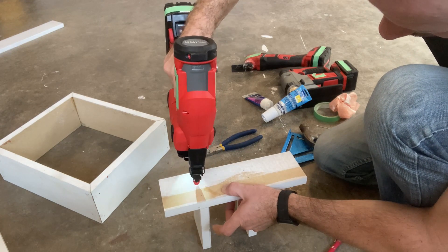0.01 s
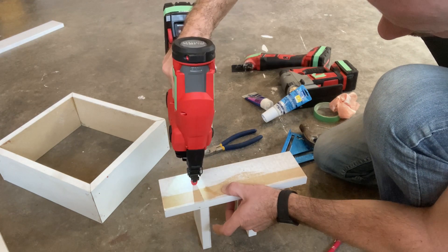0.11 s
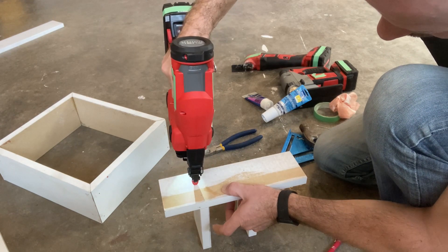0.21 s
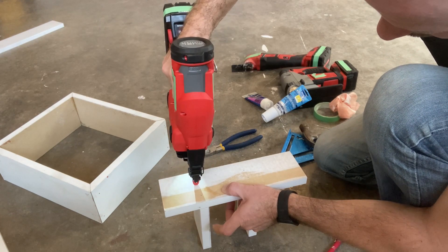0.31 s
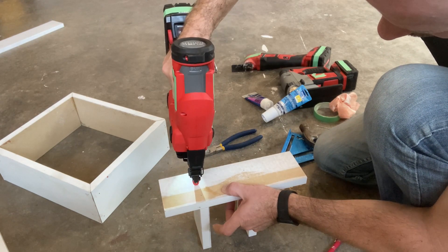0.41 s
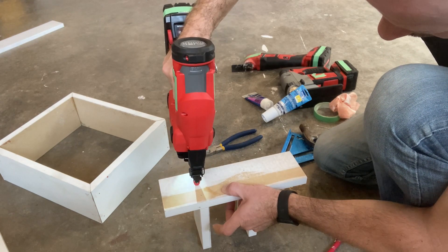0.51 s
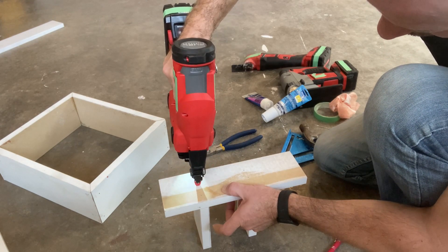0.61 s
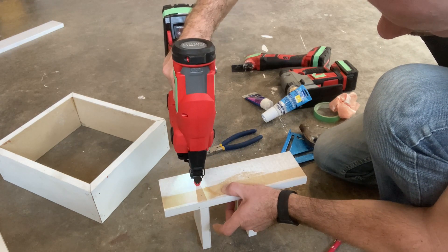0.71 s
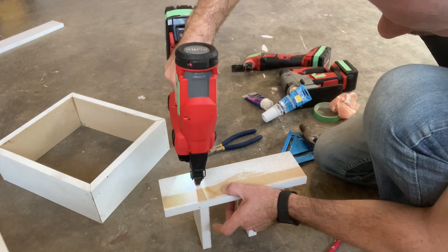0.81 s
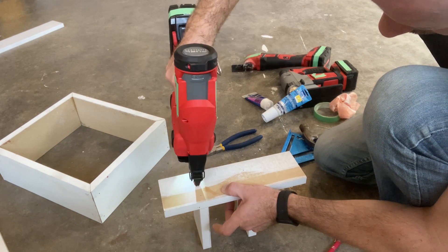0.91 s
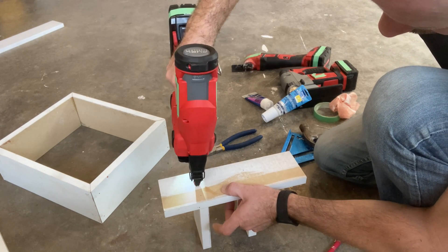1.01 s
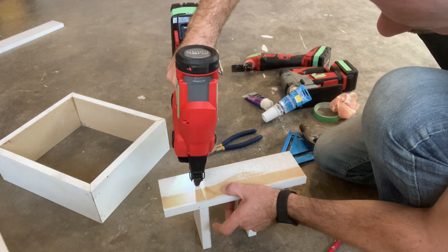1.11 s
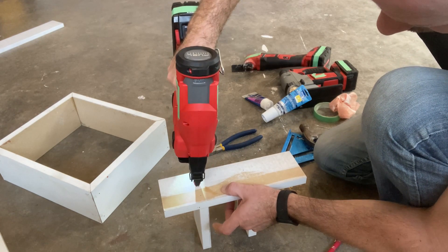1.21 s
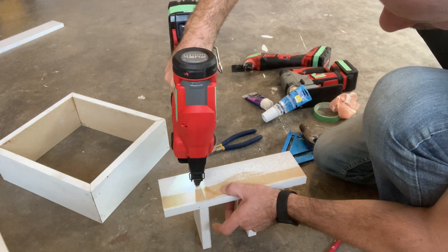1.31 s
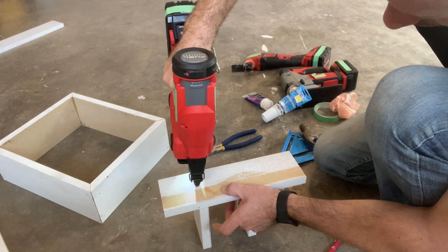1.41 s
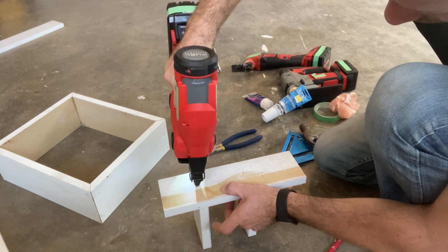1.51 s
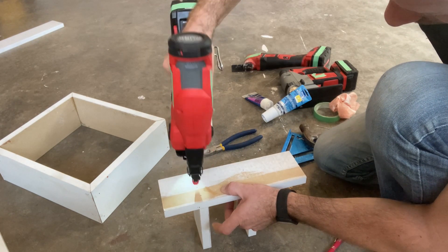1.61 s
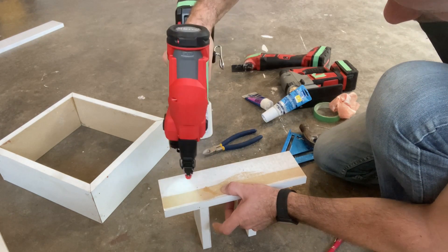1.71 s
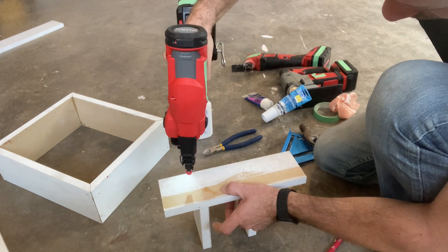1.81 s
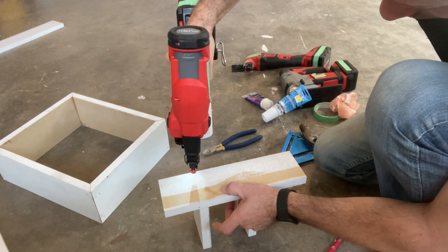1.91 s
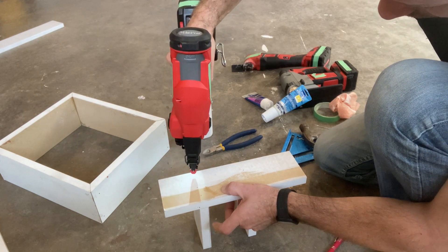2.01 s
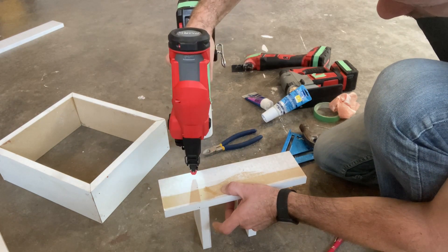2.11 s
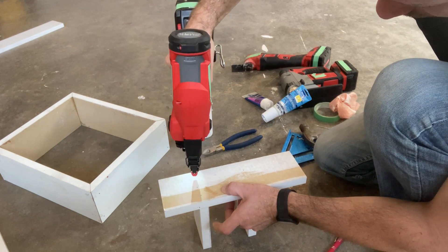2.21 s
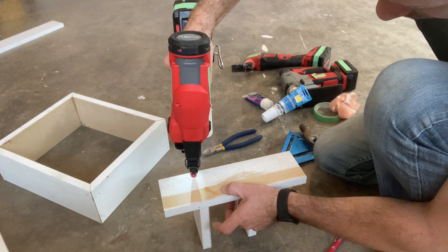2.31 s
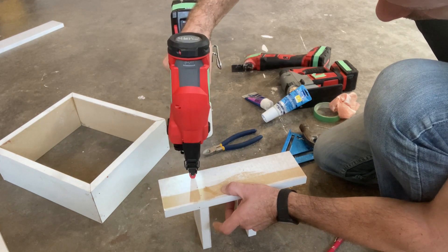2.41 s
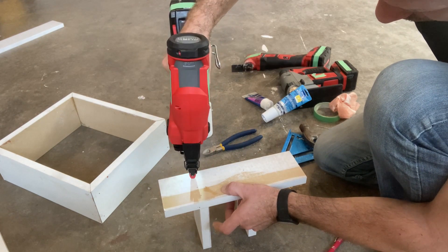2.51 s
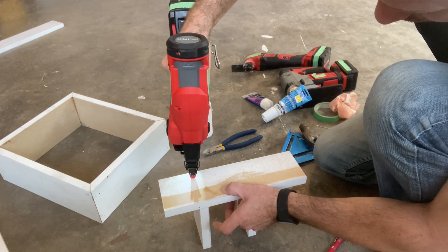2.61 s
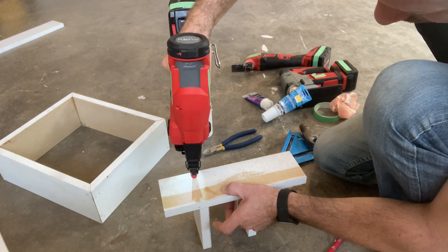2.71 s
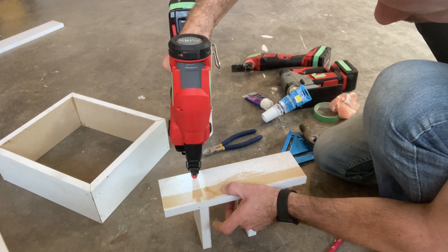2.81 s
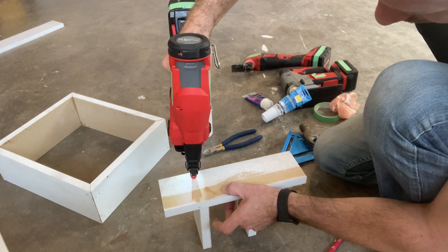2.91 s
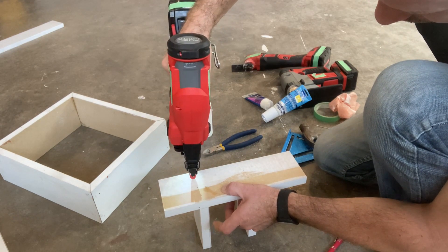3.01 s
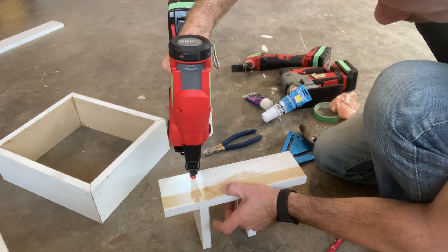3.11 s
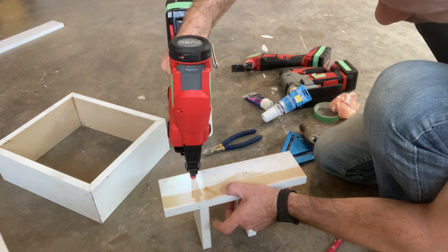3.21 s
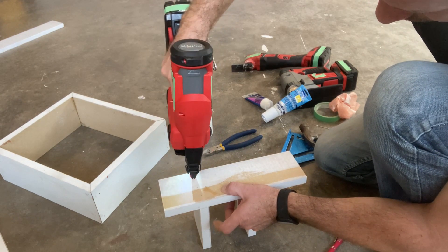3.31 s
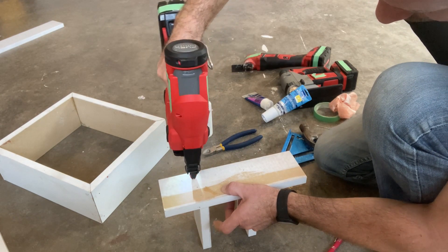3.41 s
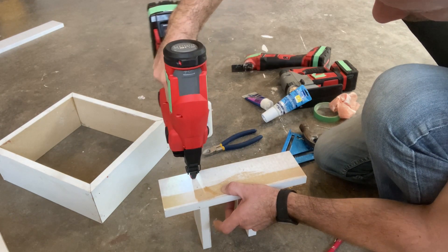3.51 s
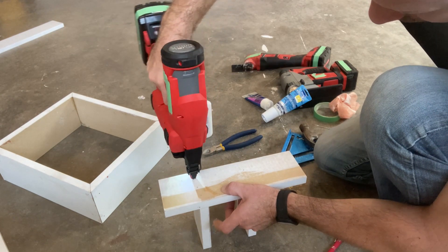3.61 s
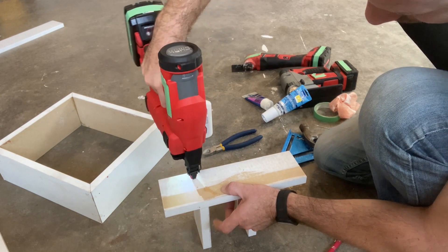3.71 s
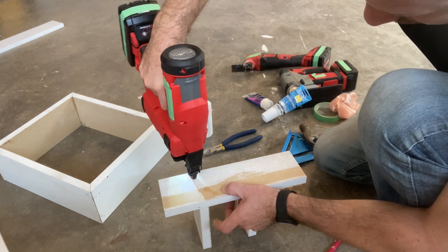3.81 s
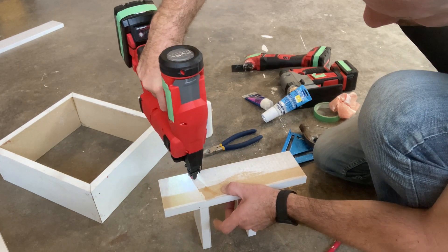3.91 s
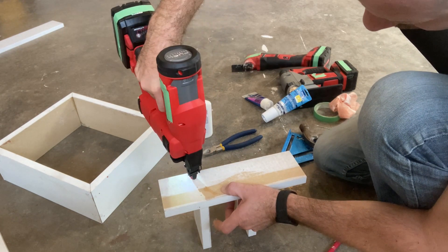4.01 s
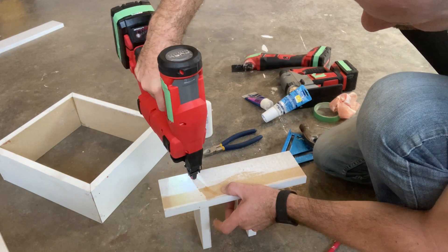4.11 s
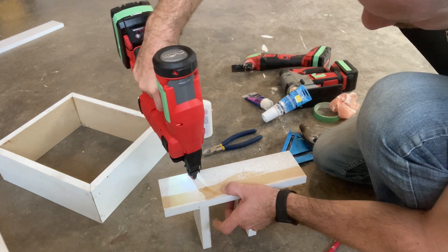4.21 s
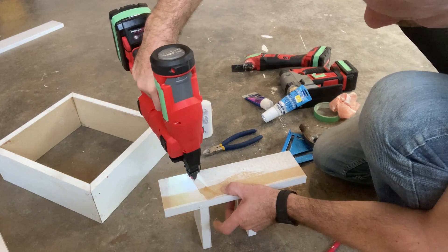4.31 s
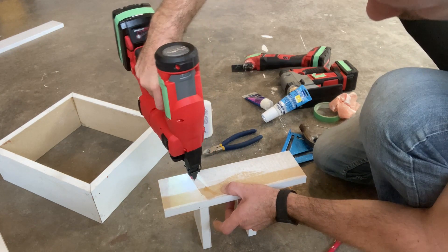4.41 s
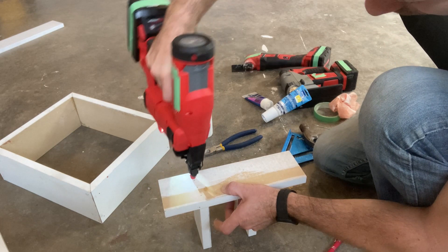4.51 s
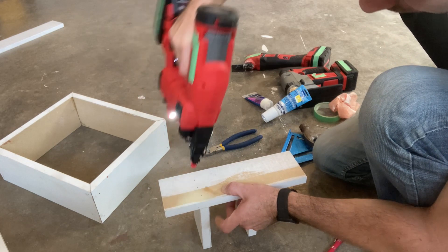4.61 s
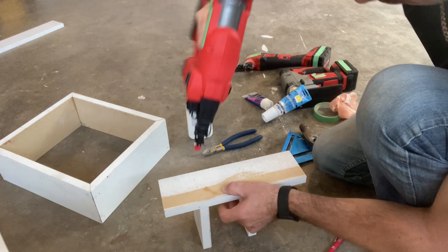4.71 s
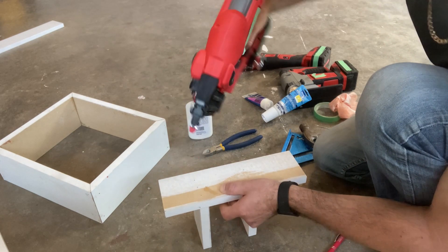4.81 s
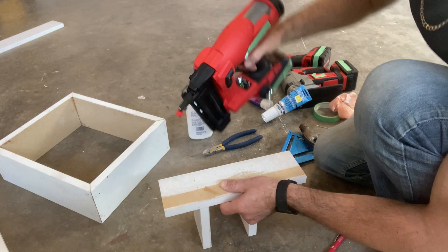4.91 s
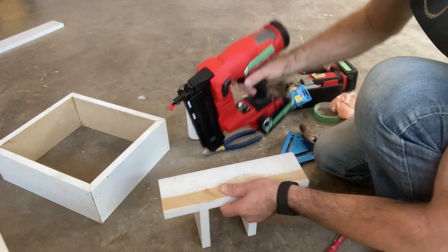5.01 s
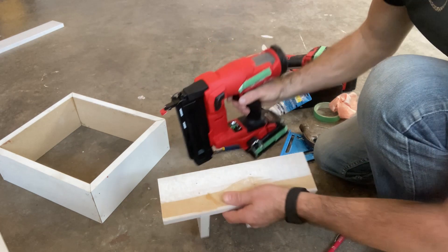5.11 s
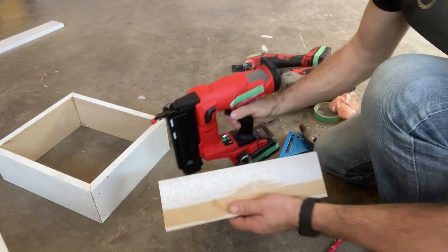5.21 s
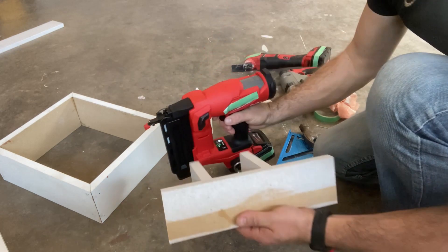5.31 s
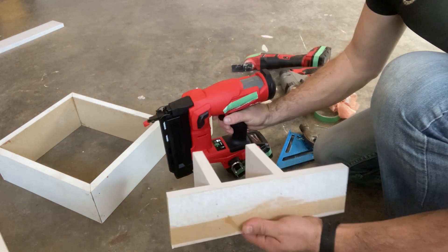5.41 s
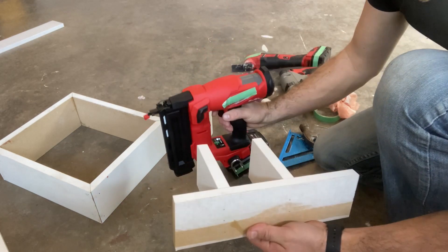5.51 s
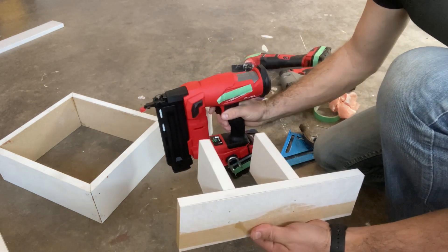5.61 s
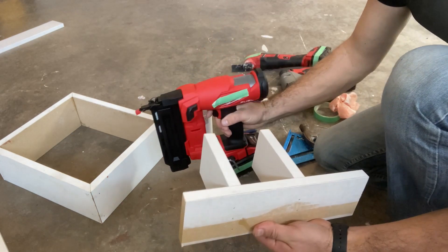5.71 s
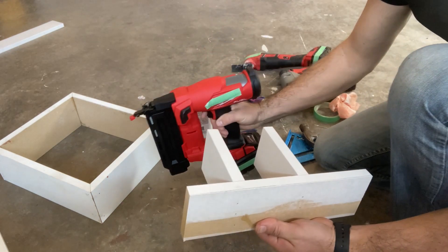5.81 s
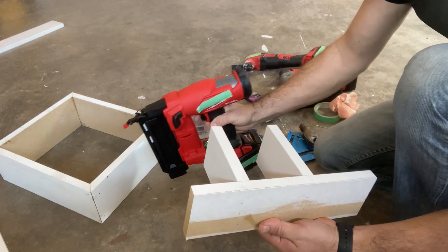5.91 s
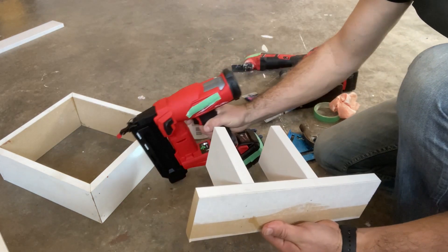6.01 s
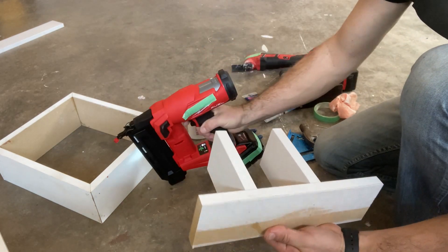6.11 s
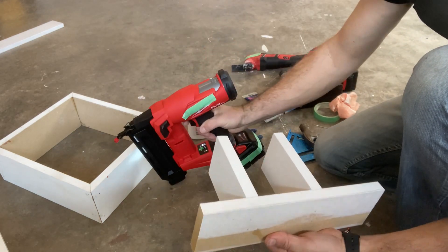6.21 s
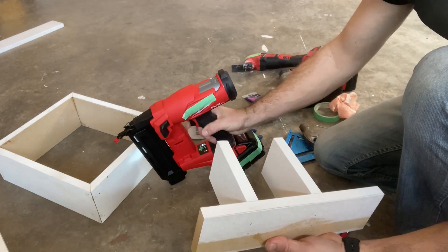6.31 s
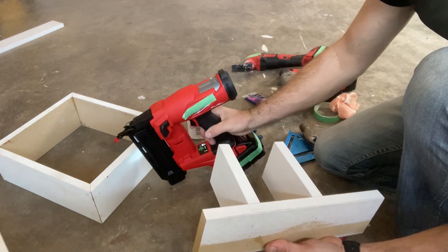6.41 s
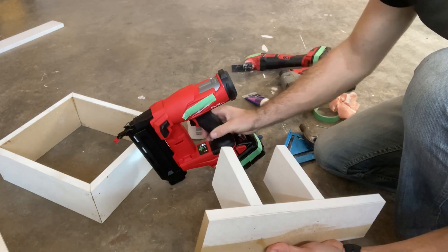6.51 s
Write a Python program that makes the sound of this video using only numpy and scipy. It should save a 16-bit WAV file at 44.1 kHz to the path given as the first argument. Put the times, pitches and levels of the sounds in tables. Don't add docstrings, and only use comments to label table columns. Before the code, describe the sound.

Quiet room tone with a low far fan, small ticks and a short rising wood creak, then a cracking nail shot with gritty gear rattle and sharp latches. Soft repositioning clicks and a slight fan swell lead to a second similar shot. Finally dull knocks and clacks as the tool and plank settle on the floor. Close stereo microphone, lively reverberant hall.

```python
import sys
import numpy as np
from scipy import signal
from scipy.fft import rfft, irfft
from scipy.io import wavfile
from scipy.ndimage import uniform_filter1d

SR = 44100
rng = np.random.default_rng(int(sys.argv[2]) if len(sys.argv) > 2 else 0)


def store_wav(level_fs):
    pcm = np.round(np.clip(np.atleast_2d(level_fs), -1, 1) * 32767)
    wavfile.write(sys.argv[1], SR, pcm.T.astype(np.int16))


def makeup_ratio(level_db):
    decades = np.asarray(level_db, float) / 20
    return 10 ** decades


N = 288855


def evened(x):
    return x / np.sqrt(np.mean(x ** 2) + 1e-20)


def read(points, hz):
    f, value = np.transpose(points)
    return np.interp(np.log(hz + 1), np.log(f + 1), value)


def add(mix, s, sound):
    part = mix[round(s * SR):][:len(sound)]
    part += sound[:len(part)]


def band(x, lo_hz, hi_hz):
    return signal.sosfilt(signal.butter(2, [lo_hz, hi_hz], "bandpass", fs=SR, output="sos"), x)


def coloured(x, points):
    n = x.shape[-1]
    return irfft(rfft(x) * makeup_ratio(read(points, np.fft.rfftfreq(n, 1 / SR))), n)


def resonate(x, hz, width):
    turn = np.exp(2j * np.pi * np.cumsum(hz * np.ones(len(x))) / SR)
    r = np.exp(-np.pi * width / SR)
    return 2 * (turn * signal.lfilter([1 - r], [1, -r], x / turn + 1e-18)).real


def resonate_twice(x, hz, width):
    return resonate(resonate(x, hz, width), hz, width)


def body(x, modes, detune=1, broad=0, widen=1):
    sign = 1 if broad else -1
    out = broad * x
    for k, (hz, width, db) in enumerate(modes):
        out = out + sign ** k * makeup_ratio(db) * resonate(x, hz * detune, width * widen)
    return out


def pair(a, b, same, hz):
    c = np.clip(read(same, hz), -1, 1)[:, None]
    return np.array([a, c * a + np.sqrt(1 - c ** 2) * b])


# f/Hz, level/dB per Hz
AIR = [(25, -23.5), (60, -9.5), (103, -11.5), (180, -21), (420, -27), (800, -27.5), (1450, -27.5),
       (1700, -33.5), (3000, -34), (7000, -39.5), (8800, -34.5), (11000, -40), (13500, -37.5),
       (15500, -51.5)]
# f/Hz, likeness [-1 to 1]
AIR_SAME = [(60, 0.95), (180, 0.91), (550, 0.34), (1650, 0.06), (4970, -0.07), (15000, 0.13)]


def air():
    frames, hz = N // 256 + 5, np.fft.rfftfreq(1024, 1 / SR)
    a, b, c, d, patches = rng.standard_normal((frames, 513, 5)).T
    patches = evened(uniform_filter1d(uniform_filter1d(patches, 12, 0), 14, 1))
    z = pair(a + 1j * b, c + 1j * d, AIR_SAME, hz) * makeup_ratio(read(AIR, hz)[:, None] + 0.88 * patches)
    return makeup_ratio(-64) * evened(signal.istft(z, nperseg=1024, noverlap=768)[1][:, :N])


def fan():
    t = np.arange(N) / SR
    swell_at_s, swell_s = 3.7, 0.35
    level = makeup_ratio(-76) + makeup_ratio(-63) * np.exp(-((t - swell_at_s) / swell_s) ** 2)
    return level * evened(resonate(rng.standard_normal(N), 94, 15))


def earlier_knock():
    fall_db = -60.5 - 81.0 * np.arange(N) / SR
    return makeup_ratio(fall_db) * evened(band(rng.standard_normal((2, N)), 650, 4600))


# f/Hz, t60/s
HALL = [(100, .5), (200, 0.43), (400, 0.93), (800, 0.72), (1840, 0.78), (4850, 0.83), (8000, 0.63),
        (12800, 0.47)]
# f/Hz, level/dB
HALL_COLOUR = [(60, -25), (200, -1.5), (600, 3.5), (3000, 3.5), (8000, 3), (15000, -7)]
# f/Hz, likeness [-1 to 1]
HALL_SAME = [(60, 0.8), (180, 1), (550, 0.06), (1650, 0.11), (4970, 0.02), (15000, 0.38)]


def hall(x, start_s, build_s, speed):
    slots = np.arange(0, 60000, 16)
    places = slots + rng.integers(0, 16, (2, len(slots)))
    taps = np.zeros((2, 60016))
    np.put_along_axis(taps, places, rng.choice([-1., 1.], (2, len(slots))), 1)
    hz, t, z = signal.stft(taps, SR, nperseg=256)
    build = np.clip((t - start_s) / build_s, 0, 1) ** 1.4
    decay_db = read(HALL_COLOUR, hz)[:, None] - 60 * speed * t / read(HALL, hz)[:, None]
    z = pair(*z, HALL_SAME, hz) * build * makeup_ratio(decay_db)
    tail = signal.istft(z, SR, nperseg=256)[1]
    return signal.fftconvolve(x[None], tail / np.linalg.norm(tail[0]), axes=1)[:, :N]


def all_round(x):
    z = rfft(x)
    even = np.sqrt(abs(uniform_filter1d(abs(z) ** 2, size=61)))
    return irfft(even * z / (abs(z) + 1e-12), len(x)) * np.linspace(1, 0, len(x)) ** 2


# f/Hz, width/Hz, level/dB
HOUSING = [(745, 140, 3.5), (1310, 100, -3), (1750, 250, -3), (2360, 400, -9.5), (3700, 400, -5.5),
           (4750, 1300, -7.5), (8700, 590, -10.5)]
# f/Hz, level/dB per Hz
TOOL = [(100, -38), (300, -14.5), (650, -2), (740, -1), (1060, -6.5), (1650, -0.5), (4800, -6), (5900, -12),
        (8800, -9.5), (11000, -13.5), (13500, -12), (16000, -20.5)]


def tool_noise(x, bright_db, detune, modes=HOUSING, broad=1.8, corner_hz=5500):
    n = len(x)
    z = rfft(coloured(body(evened(x), modes, detune, broad, widen=1.6), TOOL))
    low = 1 / (1 + (np.fft.rfftfreq(n, 1 / SR) / corner_hz) ** 3)
    return evened(irfft(z * low, n)) + makeup_ratio(bright_db) * evened(irfft(z * (1 - low), n))


# f/Hz, width/Hz, level/dB
PLANK = [(278.6, 40, -3.5), (420, 150, -0.5), (463, 220, -3), (760, 49, -6.5), (1177, 180, -4.5)]


def plank_knock(x, width_hz, detune):
    knock = body(resonate_twice(x, 540, width_hz), PLANK, detune)
    return knock / abs(knock).max()


def floor_thump(t, hz, ring_s):
    turns = np.cumsum(hz * (1 + 4.1 * np.exp(-t / 0.0018))) / SR
    return np.sin(2 * np.pi * turns) * np.exp(-t / ring_s) * np.minimum(t / .003, 1) * np.linspace(1, 0, len(t))


def hits(table, thump_hz, ring_s, push, knock_width_hz, **tool):
    ticks, sent, wood = np.zeros((3, N))
    t = np.arange(4096) / SR
    for s, tick_db, bright_db, knock_db, thump_db, ms in table:
        noise, detune = rng.standard_normal(4096), rng.uniform(.92, 1.08, 3)
        u = 5.29 * t / (max(ms, .5) / 1000)
        scuff = 0.097 * np.exp(-t / 0.035) * np.minimum(u, 1)
        burst = u ** 1.277 * np.exp(1 - u) + scuff
        tick = makeup_ratio(tick_db) * 0.45 * burst * tool_noise(noise, bright_db, detune[0], **tool)
        knock = makeup_ratio(knock_db) * 2.0 * plank_knock(noise[::-1] * burst, knock_width_hz, detune[1])
        thump = makeup_ratio(thump_db) * push * floor_thump(t, thump_hz * detune[2], ring_s)
        add(ticks, s - .0005, tick)
        add(sent, s, all_round(tick))
        add(wood, s - .0005, knock + thump)
    return ticks, sent, wood


# start t/s, length/s, top level/dB
RUSTLE = [
    (5.696, 0.084, -66.5),
    (6.365, 0.13, -62),
]


def rustle():
    out = np.zeros(N)
    for s, length, db in RUSTLE:
        swell = np.hanning(round(length * SR))
        hiss = evened(band(rng.standard_normal(N // 8), 6700, 15700))
        add(out, s, makeup_ratio(db) * swell * hiss[:len(swell)])
    return out


# f/Hz, width/Hz, level/dB
CASE = [(680, 180, 1), (1830, 142, 2.5), (2700, 290, -4.5), (4320, 280, -19), (7740, 770, -44)]
# t/s, tick level/dB, wood knock level/dB, thump level/dB
SETTING_DOWN = [(5.371, -54, -64.5, -65), (5.387, -35.5, -35.5, -43), (5.397, -32.5, -45, -34.5),
                (5.403, -30.5, -49, -33), (5.412, -32.5, -39, -46), (5.444, -52, -48, -38.5),
                (5.483, -31, -40, -41), (5.665, -35.5, -52.5, -43), (5.68, -55.5, -56, -38),
                (5.79, -58, -58, -50.5), (5.799, -47.5, -50.5, -47), (5.829, -40.5, -55, -47),
                (5.85, -67, -59.5, -47.5), (5.892, -66, -63, -58), (6.157, -49, -72.5, -75),
                (6.169, -27, -39, -42), (6.179, -39, -33, -41), (6.185, -42, -32, -26),
                (6.193, -33, -50, -47), (6.224, -52, -50, -31), (6.243, -53, -49, -34)]


def setting_down():
    bumps = [(s, tick, -13 + 0.8 * (tick + 35), knock, thump, 8.16) for s, tick, knock, thump in SETTING_DOWN]
    return hits(bumps, 81.0, 0.01, 1.49, knock_width_hz=1040, modes=CASE, broad=0.25, corner_hz=4470)


def slab(thuds):
    return makeup_ratio(1.5) * resonate(thuds, 80, 20)


def columns(rows):
    s, *rest = np.transpose(rows)
    t = np.arange(s[0], s[-1], 1 / SR)
    return (s[0], signal.windows.tukey(len(t), .15), *(np.interp(t, s, c) for c in rest))


# t/s, f/Hz, level/dB
CREAK = [(.852, 323.8, -73.5), (.868, 348.2, -56.5), (.884, 359.3, -59.5), (.896, 364.9, -47),
         (.912, 430, -54.5), (.934, 520, -52), (.946, 560, -61.5), (.965, 577.5, -71.5)]


def creak():
    s, fade, hz, db = columns(CREAK)
    noise = rng.standard_normal(len(hz))
    steady = 0.99 * np.sin(2 * np.pi * np.cumsum(hz) / SR)
    rough = .55 * evened(resonate_twice(noise, hz, 140))
    slips = 0.43 * tool_noise(noise, -15, 0.93)
    out = np.zeros(N)
    add(out, s, makeup_ratio(db) * fade * (steady + rough + slips))
    return out


# f/Hz, width/Hz, level/dB
NOSE = [(1850, 180, -1.5), (2970, 400, 1.5), (4050, 120, 1.5), (4800, 1400, -3), (6500, 640, -9),
        (9400, 900, -3.5)]
# t/s, tick level/dB, brightness/dB, wood knock level/dB
HANDLING = [(0.439, -52.5, 3.5, -68), (.485, -56, -24, -62), (.505, -51, -28, -62),
            (0.697, -49.5, 3.5, -58.5), (.725, -41, -29, -57), (.891, -69.5, -29, -55),
            (.930, -59, -14, -43.5), (0.95, -51.5, -15, -68), (1.246, -55.5, -4, -83),
            (1.283, -60, 8.5, -78), (1.301, -57, -13.5, -71), (2.536, -55, -12, -83),
            (2.552, -48.5, 1.5, -81), (2.655, -49, -3.5, -78), (2.907, -73.5, -19, -57.5),
            (2.913, -48, -7, -57), (2.937, -38.5, -17, -51.5), (2.993, -43, -12.5, -60),
            (3.165, -52, -19, -51), (3.174, -31.5, -16, -49.5), (3.222, -50.5, -31, -54),
            (3.385, -70, -15, -61.5), (3.409, -52, -3, -45), (3.421, -59.5, -19.5, -45),
            (3.458, -57.5, -4, -69.5), (4.112, -50.5, -12.5, -73.5), (6.074, -84.5, 30, -92)]
TRIGGER_S = [
    .0555,
    .0215,
]
# tick level/dB, brightness/dB, wood knock level/dB
TRIGGER = [
    (-51.5, 7, -69),
    (-40.5, 0.5, -59),
]


def nose_clicks():
    pulls = [(s - ahead, *rest) for s, *_ in SHOTS for ahead, rest in zip(TRIGGER_S, TRIGGER)]
    clicks = [(s, tick, bright, knock, knock - 22, 8) for s, tick, bright, knock in HANDLING + pulls]
    return hits(clicks, 100, 0.0081, 1.0, knock_width_hz=330, modes=NOSE, broad=1.0)


PINS_S = (.102, .1145, .1304, .184, .208, .2262, .2454)
PINS_DB = (-14, -13, -13.5, -15.5, -11.5, -12, -12)


def pins():
    out, t = np.zeros(N), np.arange(256) / SR
    for shot_s, shot_db, *_ in SHOTS:
        for s, db in zip(PINS_S, PINS_DB):
            steel = evened(band(rng.standard_normal(256), 12300, 15000))
            add(out, shot_s + s, makeup_ratio(db + shot_db) * 0.87 * np.exp(-t / .0015) * steel)
    return out


# t/s after release, level/dB, brightness/dB
DRIVE = [
    [(-.004, -35, 8), (.003, -22, 10.5), (.02, -15.5, -8), (.035, -11, -2.5)],
    [(.049, -17.5, -5), (.08, -18, -9.5), (.11, -19.5, -4), (.146, -28, -2.5)],
    [(.158, -24.5, -3.5), (.19, -15.5, -5), (.229, -15, 2), (.268, -19, 1.5)],
]
LOAD_AT_S = [
    .128,
    .172,
]


def drive():
    out = np.zeros(N)
    lump_s, lump_db, load_spread_s, teeth_per_s = 0.0058, 3, 0.032, 1800
    for shot_s, shot_db, *loads_db in SHOTS:
        for rows in DRIVE:
            s, fade, db, bright_db = columns(rows)
            n = len(db)
            t = s + np.arange(n) / SR
            for load_db, at_s in zip(loads_db, LOAD_AT_S):
                db = db + load_db * np.exp(-((t - at_s) / load_spread_s) ** 2)
            force = makeup_ratio(1.2 * np.minimum(rng.exponential(1, n), 3))
            teeth = force * (rng.random(n) < teeth_per_s / SR) * rng.choice([-1., 1.], n)
            lump = np.hanning(round(lump_s * SR))
            lumps = evened(signal.oaconvolve(rng.standard_normal(n), lump, "same"))
            contact = (evened(teeth) + .5 * rng.standard_normal(n)) * makeup_ratio(lump_db * lumps)
            add(out, shot_s + s, makeup_ratio(db + shot_db - 8.5) * fade * tool_noise(contact, bright_db, 0.94))
    return out


# release t/s, strength level/dB, motor load before the first latch/dB, load after it/dB
SHOTS = [
    (1.369, 0.0, 0, -5.5),
    (4.266, -1, -6, 6),
]
CYCLE_S = [
    0,
    .027,
    .0345,
    .0415,
    .149,
    .257,
]
# tick level/dB, brightness/dB, wood knock level/dB, thump level/dB, length/ms
CYCLE = [
    (-26, 5, -40.5, -56.5, 11),
    (-15.5, -8, -27, -50, 7.9),
    (-4, 0, -24, -36.5, 13),
    (-14, -12, -15, -13, 6.9),
    (-5.5, 5.5, -26, -48.5, 7.3),
    (-7.5, -7, -34, -64, 4.2),
]


def nailing():
    blows = []
    for s, db, *_ in SHOTS:
        for after, (tick, bright, knock, thump, ms) in zip(CYCLE_S, CYCLE):
            blows.append((s + after, tick + db, bright, knock + db, thump + db, ms))
    return hits(blows, 91, 0.0054, 3.3, knock_width_hz=1600)


def placed(x, pan_db, spread, bass_left):
    early = rng.standard_normal((2, 500)) * (rng.random((2, 500)) < .05) * np.linspace(1, .2, 500)
    early = spread * early / np.linalg.norm(early, axis=1, keepdims=True)
    bass = signal.sosfilt(signal.butter(1, 300, fs=SR, output="sos"), x) * np.array([[bass_left], [-bass_left]])
    reflected = signal.oaconvolve(band(x, 340, 9300)[None], early, axes=1)[:, :N]
    return (x + bass + reflected) * makeup_ratio([[pan_db / 2], [-pan_db / 2]])


def scene():
    shots, shots_sent, blows = nailing()
    clicks, clicks_sent, knocks = nose_clicks()
    bumps, bumps_sent, thuds = setting_down()
    motor = drive() + pins()
    knocks = knocks + creak()
    thuds = thuds + slab(thuds) + rustle()
    loud = makeup_ratio(-1.5) * (shots_sent + motor) + makeup_ratio(-4.5) * blows
    small = makeup_ratio(-1.0) * clicks_sent + makeup_ratio(-7.0) * knocks + makeup_ratio(-3.0) * bumps_sent + makeup_ratio(-3.5) * thuds
    walls = hall(loud, 0.004, 0.038, 0.97) + hall(small, 0.001, .012, 1.1)
    close = placed(shots + motor + blows, -.6, 0.64, 0.26)
    close += placed(clicks + knocks, -.4, 0.25, .05)
    close += placed(bumps + thuds, -1.1, 0.88, 0.049)
    return close + walls + air() + earlier_knock() + fan()


def hush(x, under_db=-80.5, slope=0.8, most_db=7.0):
    hz, t, z = signal.stft(x, SR, nperseg=512)
    power = uniform_filter1d(uniform_filter1d((abs(z) ** 2).mean(0), 7, 0), 3, 1)
    level_db = 10 * np.log10(power + 1e-20)
    cut_db = np.clip(slope * (under_db - level_db), 0, most_db) * (hz > 1600)[:, None]
    return signal.istft(z * makeup_ratio(-cut_db), SR, nperseg=512)[1][:, :N]


# f/Hz, level/dB
MIC = [(20, 0), (10600, 0), (11100, -8), (11450, -28), (11800, -8), (12200, 0), (15100, 0), (15800, -14),
       (16400, -45)]


def microphone(x):
    left_lag_s = .000016
    lag = np.exp(-2j * np.pi * np.fft.rfftfreq(N, 1 / SR) * np.array([[left_lag_s], [0]]))
    ported = irfft(rfft(x) * lag, N)
    return coloured(0.91 * np.tanh(ported / 1.205), MIC)


def top_cut(x):
    return signal.sosfilt(signal.butter(12, 16630, fs=SR, output="sos"), x)


def record(dry):
    mix = hush(microphone(dry))
    return top_cut(mix)


dry = scene()
out = record(dry)
store_wav(out)
```